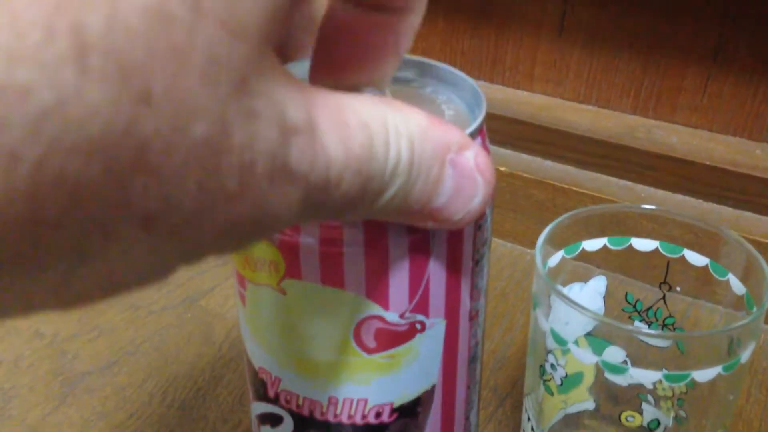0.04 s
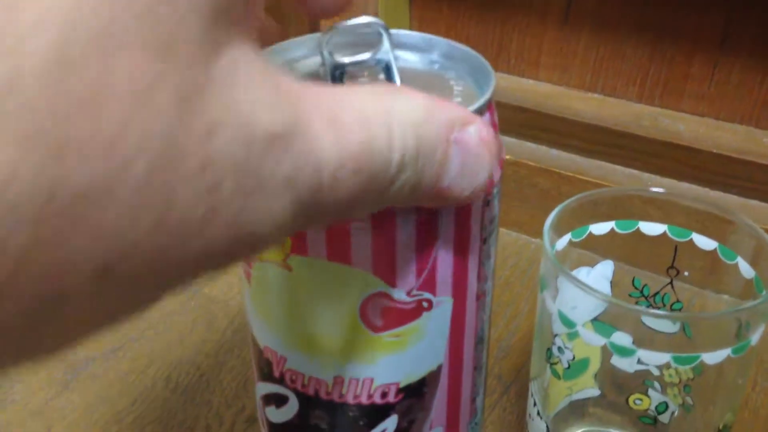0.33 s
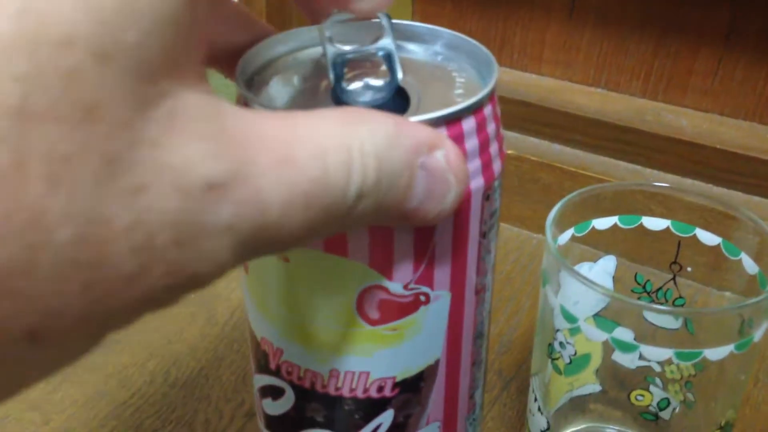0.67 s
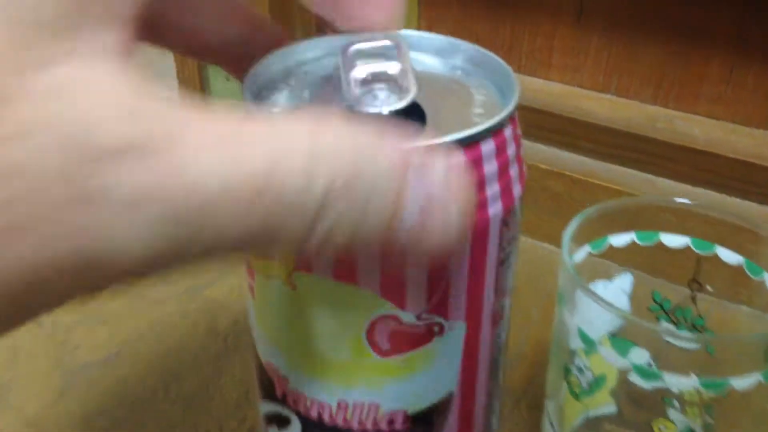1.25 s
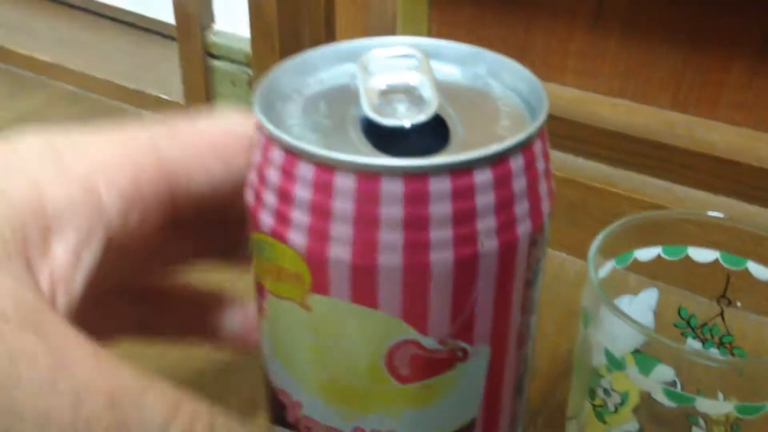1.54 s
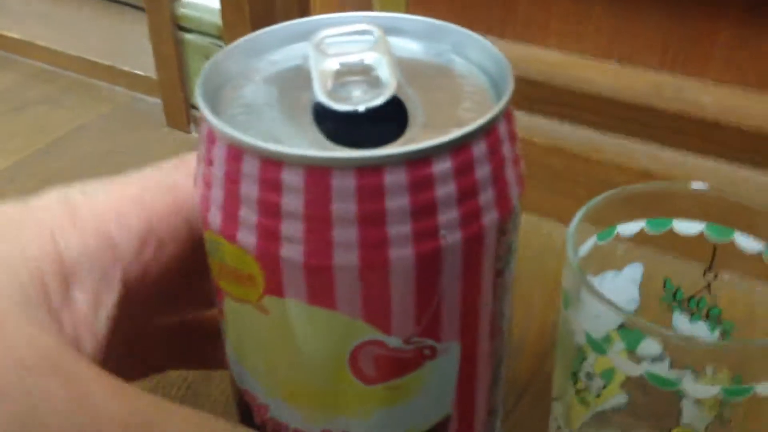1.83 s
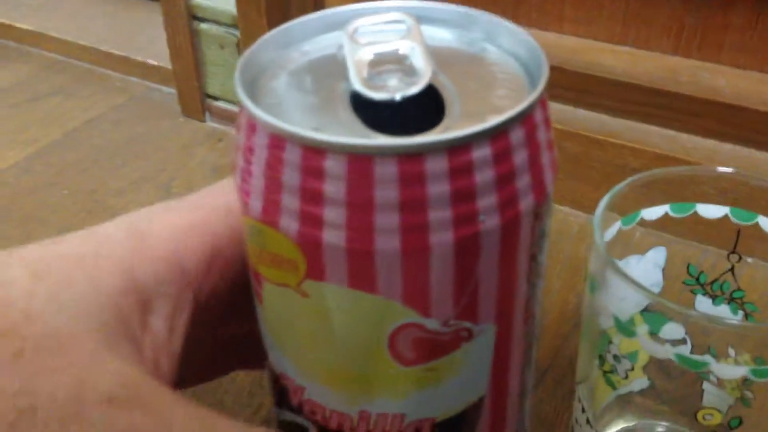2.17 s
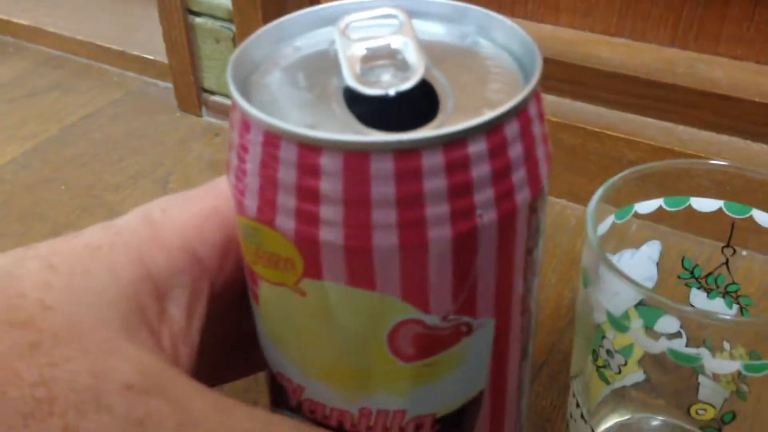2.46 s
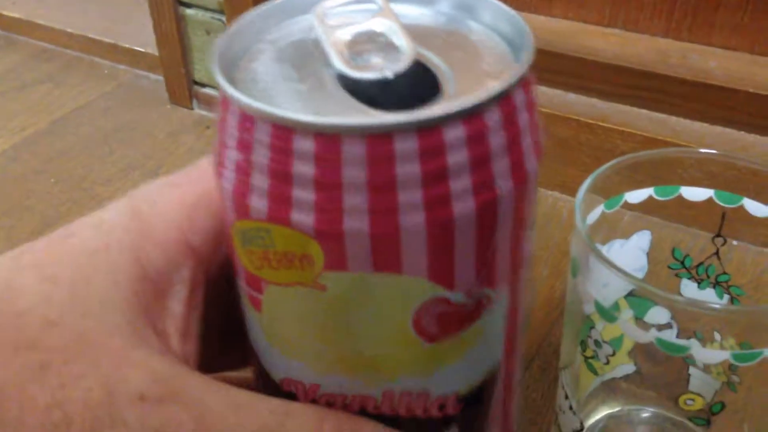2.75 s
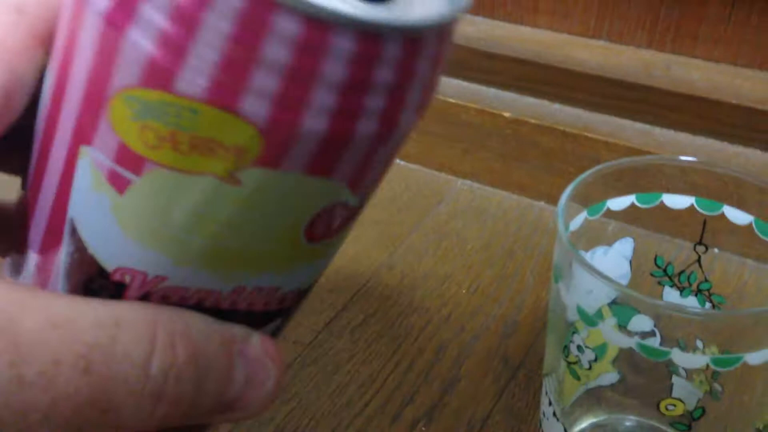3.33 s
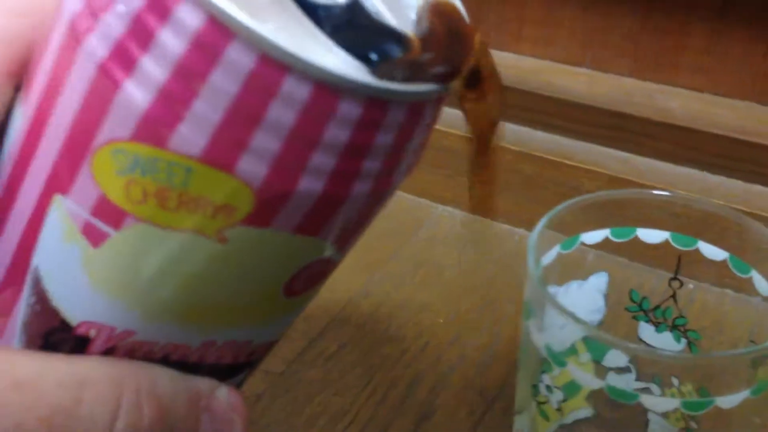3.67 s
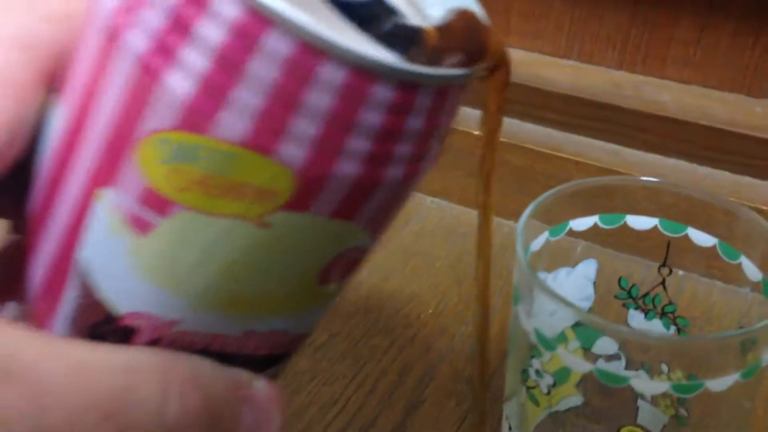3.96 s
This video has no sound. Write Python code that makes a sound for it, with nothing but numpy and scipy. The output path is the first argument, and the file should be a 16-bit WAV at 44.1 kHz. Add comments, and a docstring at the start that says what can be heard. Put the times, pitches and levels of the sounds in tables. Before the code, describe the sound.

Close by in a quiet room, a can's ring pull creaks, then clicks sharply on the thin metal. Handling thumps the wooden table, the can scrapes across it, and a small plop precedes a brief fizzy splash.

```python
"""Opening and spilling a drink can

A can stands close by on a wooden table in a quiet room. Its ring pull creaks back and snaps
against the lid, ringing the thin metal. The hand bumps the can, so that the table top booms.
The can slides off the table, the drink plops inside, and the first drops splash down and fizz."""
import sys
import numpy as np
from scipy import signal
from scipy.fft import rfft, irfft
from scipy.io import wavfile

SR = 44100
rng = np.random.default_rng(int(sys.argv[2]) if len(sys.argv) > 2 else 0)


def store_pcm(level_fs):
    """Save levels as 16-bit WAV."""
    pcm = np.round(np.clip(level_fs, -1, 1) * 32767).astype(np.int16)
    wavfile.write(sys.argv[1], SR, np.atleast_2d(pcm).T)


N = 176400
T = np.arange(N) / SR
RING_T = T[:SR // 2]  # half a second, for one short sound

# A mode is a tone that a thing rings with when struck.
# Modes of the lid (pitch [Hz], level [dB], time to fade by 60 dB [s])
LID_MODES = [(1336, 2, 0.035), (1608, -1, 0.014), (2214, -0.5, 0.044), (2452, -1.5, 0.018),
             (3304, 0.5, 0.029), (3710, -9.5, 0.02), (4210, -11.5, 0.045), (5430, -4, .04),
             (5830, -4.5, .018), (7250, -12.5, 0.067), (8540, -9, 0.036), (9230, -6.5, 0.021),
             (11200, -11.5, 0.013)]
# Modes of the ring pull (pitch [Hz], level [dB], time to fade by 60 dB [s])
PULL_MODES = [(900, -8.5, 0.036), (1174, 0, 0.02), (1363, 1, 0.032), (1625, -3, 0.021), (2266, -6, 0.021),
              (2610, -1.5, 0.028), (3416, -8, 0.021), (3874, -11.5, 0.033), (4840, -12, 0.018),
              (6230, -10.5, 0.03), (8400, -14, 0.022)]
# Modes of the can standing on wood (pitch [Hz], level [dB], time to fade by 60 dB [s])
BASE_MODES = [(226, -6, 0.14), (287.6, -3.5, .1), (432, 1, .07), (578, -11, 0.039), (693, -9.5, 0.058),
              (837, -13, 0.061), (1050, -13, 0.045)]


def amp(db):
    """Turn decibels into a gain."""
    return 10 ** (np.asarray(db) / 20)


def unit(x):
    """Scale to an average strength (rms) of 1."""
    return x / (x.std() + 1e-12)


def peak(x):
    """Scale to a peak of 1."""
    return x / np.abs(x).max()


def curve(points):
    """A gain that follows (time [s], level [dB]) points and is zero outside them."""
    s, db = np.array(points).T
    return amp(np.interp(T, s, db, left=-np.inf, right=-np.inf))


def cut(x, hz, keep, order=2):
    """Filter x, keeping the "low" or the "high" side of hz."""
    return signal.sosfilt(signal.butter(order, min(hz, SR / 2 - 1000), keep, fs=SR, output="sos"), x)


def add(out, start_s, x):
    """Mix x into out at the given time."""
    i = max(int(start_s * SR), 0)
    out[i:i + len(x)] += x[:N - i]


def ring(x, modes):
    """Shake an object with x: each of its modes answers with a fading tone."""
    body = sum((-1) ** k * amp(db) * np.sin(2 * np.pi * hz * RING_T)
               * np.exp(-np.log(1000) * RING_T / fade_s) for k, (hz, db, fade_s) in enumerate(modes))
    return signal.fftconvolve(x, body)[:len(x)]


def grains(per_s, scatter_db, size=N):
    """Tiny random ticks of uneven strength."""
    ticks = (rng.random(size) < per_s / SR) * rng.choice([-1, 1], size)
    return ticks * amp(scatter_db * rng.standard_normal(size))


def burst(decay_s):
    """A puff of noise that dies quickly."""
    return rng.standard_normal(len(RING_T)) * np.exp(-RING_T / decay_s)


def room_tone():
    """The room's steady low murmur and faint hiss."""
    # Strength of the noise from bass to treble (frequency [Hz], level [dB])
    spectrum = [(15, -54), (25, -39), (49, -9), (75, 1), (98, 0), (115, -12.5), (146, -3.5), (231, -13),
                (438, -15), (558, -19), (1180, -24.5), (1350, -21.5), (1580, -27), (2240, -24.5),
                (2500, -26), (8320, -30), (15000, -34)]
    hz, db = np.array(spectrum).T
    colour = amp(np.interp(np.log(np.fft.rfftfreq(N, 1 / SR) + 1), np.log(hz), db))
    return amp(-65.5) * unit(irfft(rfft(rng.standard_normal(N)) * colour, N))


def room_echo(sound):
    """A small furnished room sends back a short, faint echo."""
    fade_s, delay_s = 0.13, 0.009
    echo = cut(burst(fade_s / np.log(1000)) * (RING_T > delay_s), 9700, "low", order=1)
    return amp(-22) * signal.fftconvolve(sound, echo / np.sqrt(np.sum(echo ** 2)))[:N]


def can_fizz():
    """Tiny bubbles burst in the can, livelier after it has been jolted."""
    pops = grains(per_s=700, scatter_db=6.6)
    liveliness = curve([(0, -23), (1.4, -4), (1.75, 4.5), (2.2, 0), (3, 0), (4, -23)])
    fizz = unit(ring(pops, LID_MODES)) + unit(cut(pops, 5000, "high"))
    return amp(-72.5) * liveliness * unit(fizz)


def finger_rubs():
    """Skin rubs on the can with a fine hiss and rings the ring pull."""
    # Loudness of the rubbing (time [s], level [dB])
    loudness = [(0, -68.5), (.05, -66.5), (.11, -81), (.155, -85), (.185, -57.5), (.23, -54), (.28, -72),
                (.5, -90), (.535, -63), (.575, -61), (.63, -91), (1.255, -74.5), (1.29, -48),
                (1.302, -62.5), (1.37, -64), (1.45, -74.5), (1.6, -87)]
    skin = grains(per_s=6000, scatter_db=3.8)
    hiss = cut(cut(skin, 680, "high"), 4500, "low", order=1)
    return curve(loudness) * unit(unit(hiss) + amp(3) * unit(ring(skin, PULL_MODES)))


def can_slide():
    """The rim catches on the wood grain and shakes base, lid and table."""
    # Loudness of the scraping base (time [s], level [dB])
    loudness = [(2.38, -71), (2.42, -52.5), (2.47, -57.5), (2.51, -68), (2.55, -55.5), (2.585, -47.5),
                (2.645, -48), (2.675, -61), (2.72, -50.5), (2.78, -56.5), (2.83, -60), (2.868, -55),
                (2.9, -76)]
    catches = grains(per_s=2500, scatter_db=4.2)
    base = unit(ring(catches, BASE_MODES))
    lid = unit(cut(ring(catches, LID_MODES), 2600, "low", order=1))
    grit = unit(cut(cut(catches, 550, "high"), 5500, "low"))
    boom = unit(ring(catches, [(123, -6.5, 0.17), (153, -5.5, 0.093)]))
    return curve(loudness) * (base + amp(-9) * lid + amp(-12.5) * grit + amp(3.5) * boom)


def table_bumps():
    """Each push knocks the can's base and makes the table top boom."""
    # Pushes (time [s], boom level [dB], boom pitch [Hz], rise [s], hold [s], knock peak [dB])
    pushes = [(.0, -46, 135, 0.041, 0.021, -59), (0.154, -42, 135, 0.019, 0.024, -56),
              (.194, -39.5, 145, 0.0072, .008, -53), (0.266, -39.5, 120, 0.016, 0.009, -50.5),
              (.315, -42, 125, 0.009, 0.0045, -60), (0.361, -33, 134, 0.012, .016, -44.5),
              (.549, -32, 124, 0.019, 0.031, -44), (1.096, -33.5, 124, 0.0072, .006, -66.5),
              (1.291, -23.5, 124, .006, 0.0035, -39.5), (1.338, -24.5, 122, .014, 0.02, -30),
              (1.386, -32.5, 121, 0.015, 0.051, -40.5), (1.448, -25.5, 122, 0.015, 0.0067, -44),
              (1.519, -38, 120, 0.015, 0.025, -51), (2.408, -20, 119, 0.032, 0.026, -37)]
    release_s, tail_s = 0.015, 0.12
    out, t = np.zeros(N), RING_T
    knock = peak(ring(np.exp(-t / 0.00077), BASE_MODES))
    for start, db, hz, rise, hold, knock_db in pushes:
        swell = np.sin(np.pi / 2 * np.minimum(t / rise, 1)) ** 2
        after_hold = np.maximum(t - rise - hold, 0)
        fall = np.exp(-after_hold / release_s) + amp(-20) * np.exp(-after_hold / tail_s)
        boom = swell * fall * np.sin(2 * np.pi * hz * t)
        add(out, start, amp(db) * boom + amp(knock_db) * knock)
    return out


def drink_plops():
    """Bubbles in the tilted can ring with short tones that rise a little in pitch."""
    # Bubbles (time [s], peak [dB], starting pitch [Hz])
    bubbles = [(3.1633, -39, 1237), (3.204, -62, 1260), (3.2206, -58, 1220)]
    swell_s, glide_per_s = 0.0044, 7.4
    out, t = np.zeros(N), RING_T
    swell = (t / swell_s) ** 2 * np.exp(-(t / swell_s) ** 2)
    for start, db, hz in bubbles:
        tone = np.sin(2 * np.pi * hz * t * (1 + glide_per_s * t / 2))
        add(out, start, amp(db) * peak(swell * tone))
    return out


def spilling_drops():
    """Drops slap down with a bright splash and a soft thud, then foam."""
    # Drops landing (time [s], splash peak [dB], low edge of the splash [Hz], thud peak [dB])
    drops = [(3.883, -41.5, 890, -43), (3.905, -39.5, 1000, -42), (3.916, -46, 8000, -48),
             (3.9224, -34, 1200, -54), (3.93, -37, 10000, -59), (3.9423, -8, 3860, -43.5),
             (3.947, -17, 4450, -47.5), (3.956, -39, 4000, -48.5), (3.9699, -43, 4000, -49.5),
             (3.987, -42, 6000, -44.5)]
    # Loudness of the foam (time [s], level [dB])
    foam_loudness = [(3.87, -91), (3.91, -74), (3.94, -60), (3.952, -54), (3.975, -58), (4, -55)]
    out, t = np.zeros(N), RING_T
    ping = np.sin(2 * np.pi * 4510 * t) * np.exp(-t / 0.0031)
    thud = peak(ring(np.exp(-t / 0.00016), BASE_MODES + [(157.5, 6, .1)]))
    for start, db, low_hz, thud_db in drops:
        splash = cut(peak(burst(decay_s=0.0014)) + amp(-12) * ping, low_hz, "high")
        add(out, start, amp(db) * peak(splash) + amp(thud_db) * thud)
    foam = signal.fftconvolve(grains(per_s=5000, scatter_db=4.5), burst(decay_s=0.00021))[:N]
    return out + curve(foam_loudness) * unit(cut(foam, 3900, "high", order=3))


def pull_creaks():
    """The hinge sticks and slips, ringing the ring pull; the grip makes one tone stand out."""
    # Creaks (time [s], length [s], level [dB], tone [Hz], tone's relative level [dB], brightness [Hz])
    creaks = [(0.0628, 0.019, -40.5, 1280, -21, 5370), (0.084, 0.0048, -46, 1364, -2, 3000),
              (.195, 0.019, -49, 1400, -3, 6000), (.219, 0.0083, -37, 2710, -6, 6000),
              (0.2245, .011, -31.5, 2628, -0.5, 4400), (0.241, .012, -52, 866, 0, 3000),
              (.315, 0.0048, -52, 2245, 10, 2500), (.369, 0.01, -56, 1490, -7.5, 4000),
              (0.5172, 0.0042, -43, 1247, 3.5, 3000), (0.546, 0.014, -52, 3840, -8, 5000),
              (1.2265, 0.0029, -48.5, 2210, -9, 4000), (1.308, .008, -50.5, 3270, -4, 5000),
              (1.3587, 0.0082, -45.5, 2240, 3.5, 9100)]
    out = np.zeros(N)
    for start, length, db, tone_hz, tone_db, bright_hz in creaks:
        slips = grains(per_s=900, scatter_db=2, size=len(RING_T)) * (RING_T < length)
        slips[0] = 2  # a firm first slip
        grit = cut(signal.fftconvolve(slips, burst(decay_s=0.00056))[:len(slips)], 700, "high")
        metal = unit(ring(slips, PULL_MODES)) + amp(-10) * unit(grit)
        tone = unit(ring(slips, [(tone_hz, 0, .035)]))
        creak = unit(cut(metal, bright_hz, "low", order=1)) + amp(tone_db) * tone
        add(out, start, amp(db) * creak * np.sqrt(length * SR / np.sum(creak ** 2)))
    return out


def lid_clicks():
    """The ring pull or a fingernail hits the lid, which rings with a sharp crack."""
    # Hits (time [s], peak [dB], brightness [Hz])
    hits = [(.2685, -58, 2500), (1.0959, -14, 15000), (1.2901, -48, 9900), (2.4094, -49.5, 4960),
            (2.525, -46.5, 4000)]
    out = np.zeros(N)
    lid = peak(ring(signal.unit_impulse(len(RING_T)), LID_MODES))
    for start, db, bright_hz in hits:
        crack = unit(cut(burst(decay_s=0.0022), 1300, "high", order=3)) * lid.std()
        add(out, start, amp(db) * peak(cut(lid + amp(4) * crack, bright_hz, "low")))
    return out


def scene():
    """Mix all the sounds and the room's echo into one channel."""
    near = pull_creaks() + lid_clicks() + finger_rubs() + can_slide() + drink_plops() + spilling_drops()
    return (near + room_echo(near) + table_bumps() + can_fizz() + room_tone())[None]


def record(dry):
    """Cut away the very highest treble."""
    top_hz = 15400
    return signal.sosfilt(signal.ellip(10, .2, 70, top_hz, fs=SR, output="sos"), dry)


dry = scene()
out = record(dry)
store_pcm(out)
```